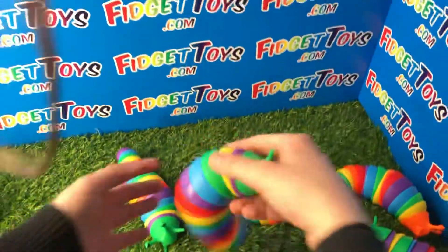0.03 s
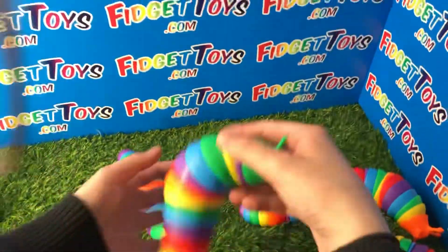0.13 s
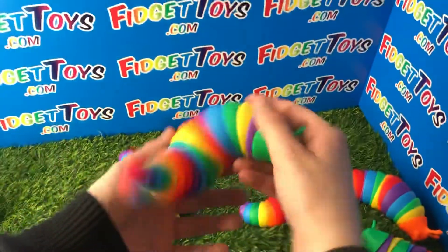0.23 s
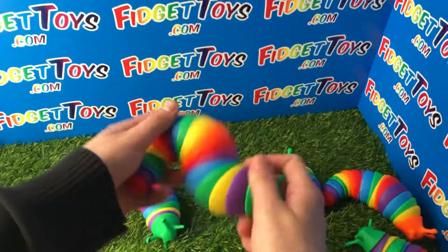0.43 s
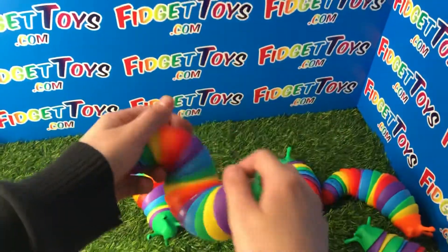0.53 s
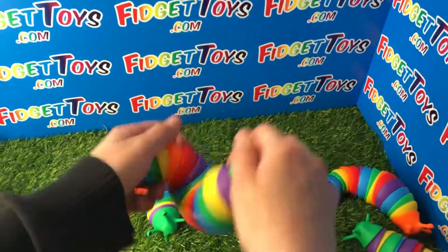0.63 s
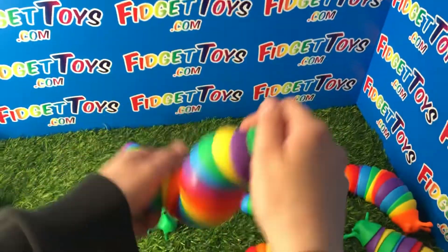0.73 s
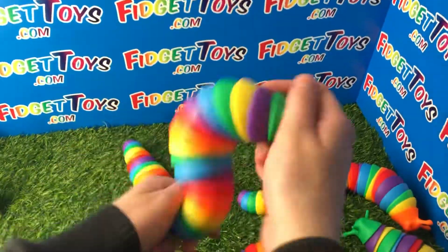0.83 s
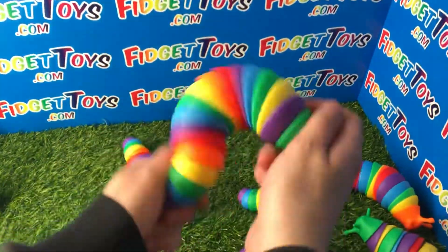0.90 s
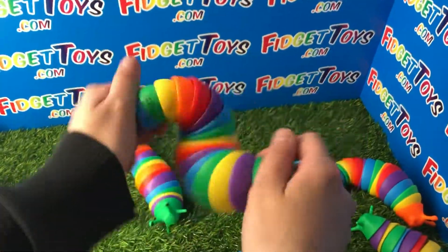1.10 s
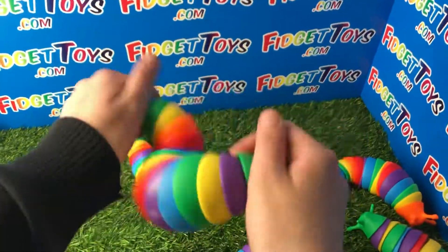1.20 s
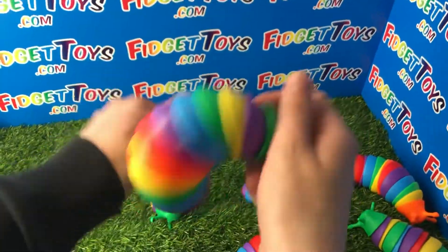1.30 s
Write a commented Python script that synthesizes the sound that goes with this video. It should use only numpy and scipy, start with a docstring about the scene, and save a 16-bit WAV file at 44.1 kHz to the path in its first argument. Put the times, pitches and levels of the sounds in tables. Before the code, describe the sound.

Plastic segments of a fidget slug click and clatter unevenly, close by in a quiet room.

```python
"""Two hands flex a segmented plastic slug toy close by in a small, quiet room.
From the start a low hum swells and fades over steady noise, and friction makes the joints rub and tick.
Then the nested cup-shaped segments collide in bursts: each impact excites a sharp crack, a clatter of
the shells and the damped modes of a cup. Four times the toy's weight bumps softly into the hands.
Near the end, as the knocks weaken, the joints give two faint squeaks."""
import sys
import numpy as np
from scipy import signal
from scipy.fft import rfft, irfft, next_fast_len
from scipy.io import wavfile
from scipy.ndimage import map_coordinates

SR = 44100
rng = np.random.default_rng(int(sys.argv[2]) if len(sys.argv) > 2 else 0)


def generate_wav(sig):
    """Save sig (samples, or channels by samples) to the path in sys.argv[1] as 16-bit PCM at SR."""
    pcm = np.round(np.clip(np.atleast_2d(sig).T, -1, 1) * 32767).astype(np.int16)
    wavfile.write(sys.argv[1], SR, pcm)


N = 59535
CONTACT_S, KNOCK_S = 0.00197, 0.004
TOP_HZ = 16000


def amp(db):
    """Amplitude ratio of a level in decibels."""
    return 10 ** (np.asarray(db) / 20)


def unit(x):
    """Normalisation to rms 1."""
    return x / np.sqrt(np.mean(x ** 2) + 1e-20)


def along(points, hz):
    """Interpolation of (f/Hz, value) rows on a logarithmic frequency axis."""
    f, values = np.transpose(points)
    return np.interp(np.log(hz + 1), np.log(f + 1), values)


def envelope(rows):
    """Amplitude at each sample, interpolated from (t/s, level/dB) rows."""
    return amp(np.interp(np.arange(N) / SR, *np.transpose(rows)))


def wobble(rate):
    """Random modulation: a spline through `rate` random values a second."""
    return map_coordinates(rng.standard_normal(N // 10), [np.arange(N) * rate / SR], mode="wrap")


def noise(spectrum, size, ripple_db=0, ripple_hz=500):
    """Filtered white noise of rms 1; ripple adds the spectral peaks and dips of one contact point."""
    hz = np.fft.rfftfreq(size, 1 / SR)
    ripple = map_coordinates(rng.standard_normal(int(SR / ripple_hz)), [hz / ripple_hz])
    gain = amp(along(spectrum, hz) + ripple_db * ripple)
    return unit(irfft(rfft(rng.standard_normal(size)) * gain, size))


def strike(t, attack_s, t60_s):
    """Impact envelope: a rise, undamped during contact, then exponential free decay."""
    decay = np.exp(-np.log(1000) * np.maximum(t - CONTACT_S, 0) / t60_s)
    return (1 - np.exp(-t / attack_s)) * decay


def at_level(x, db):
    """Equal energy: x is scaled to match a level db held for KNOCK_S."""
    return amp(db) * x * np.sqrt(KNOCK_S * SR / (np.sum(x ** 2) + 1e-20))


def add(track, start_s, x):
    """Superposition of x on the track."""
    i = max(round(start_s * SR), 0)
    track[i:i + len(x)] += x[:max(len(track) - i, 0)]


# Envelope of the hum: t/s, level/dB
HUM_LEVELS = [(0, -53), (.07, -49), (.21, -48), (.56, -69.5), (.92, -59.5), (1.3, -68)]
# Spectrum of the ambient noise: f/Hz, relative level/dB
AMBIENT_SPECTRUM = [(25, -28), (55, 14), (110, -0.5), (220, -4), (2000, -8), (4000, -19), (15500, -36)]


def background(hum_hz=83.2, octave_db=-18.5, ambient_db=-59.5):
    """Amplitude modulation: a fundamental and its octave swell and fade over steady room noise."""
    phase = 2 * np.pi * hum_hz * np.arange(N) / SR
    hum = unit(np.sin(phase) + amp(octave_db) * np.sin(2 * phase))
    return envelope(HUM_LEVELS) * hum + amp(ambient_db) * noise(AMBIENT_SPECTRUM, N)


# Spectrum of the plastic shells: f/Hz, relative level/dB
SHELL_SPECTRUM = [(200, -33), (700, -26), (1050, -15), (1450, -2), (2150, 4.5), (2650, 2.5), (3700, -24),
                  (8000, -39)]


def clatter(t):
    """Impact excitation: the shells answer a touch with a decaying band of noise."""
    return noise(SHELL_SPECTRUM, len(t)) * strike(t, attack_s=0.0009, t60_s=0.021)


# Envelope of the segments' sliding: t/s, level/dB
RUB_LEVELS = [(0, -57.5), (.14, -61), (.28, -50.5), (.49, -49), (.6, -61), (.8, -44), (.86, -59),
              (1.35, -61)]
# Spectrum of the friction noise: f/Hz, relative level/dB
RUB_SPECTRUM = [(400, -26), (1000, -12), (1600, -5), (2500, 1), (3900, -14), (5200, -9.5), (7000, -14),
                (15000, -18.5)]


def rubbing(roughness_db=1.8, ticks_per_s=42, tick_db=5, count=120):
    """Sliding friction: the joints scrape in small uneven slips, and light touches tick above them."""
    slide = unit(noise(RUB_SPECTRUM, N) * amp(roughness_db * wobble(rate=300)))
    t = np.arange(1024) / SR
    for start_s in (np.arange(count) + rng.random(count)) / ticks_per_s:
        add(slide, start_s, at_level(clatter(t), tick_db + rng.normal(0, 0.99)))
    return envelope(RUB_LEVELS) * slide


def mode(t, hz, db):
    """A normal mode, excited with random strength and phase."""
    return amp(db + rng.normal(0, 2.14)) * np.sin(2 * np.pi * (hz * t + rng.random()))


# Modes of a cup: f/(ring pitch), relative level/dB
CUP_PARTIALS = [(0.76, -19), (0.996, 0.5), (1.089, -4.5)]


def cup_ring(t, pitch_hz):
    """Damped free vibration: the modes of a struck cup give a hollow ring."""
    modes = sum(mode(t, pitch_hz * ratio, db) for ratio, db in CUP_PARTIALS)
    return modes * strike(t, attack_s=0.0006, t60_s=0.017)


# Modes of a segment's rim: f/Hz, relative level/dB
RIM_PARTIALS = [(5100, 5.5), (6400, -20), (7900, 5), (11500, -6)]
# Spectrum of the crack: f/Hz, relative level/dB
CRACK_SPECTRUM = [(500, -20.5), (2500, -26), (3800, 1.5), (5100, 4), (6800, -1), (11500, -5), (15500, -8.5)]


def crack(t, hardness_db, attack_s=0.00016, ping_db=-7):
    """Contact transient: a broadband burst, brighter for a harder impact, and a ping of the rim modes."""
    rim = sum(mode(t, hz * rng.normal(1, 0.0188), db) for hz, db in RIM_PARTIALS)
    ping = amp(ping_db) * unit(rim) * strike(t, attack_s, t60_s=0.028)
    spectrum = [(hz, db + 0.22 * hardness_db * hz / TOP_HZ) for hz, db in CRACK_SPECTRUM]
    snap = 1 + 1.15 * np.exp(-2 * t / CONTACT_S)  # strongest at first touch
    burst = noise(spectrum, len(t), ripple_db=5) * snap * strike(t, attack_s, t60_s=0.022)
    return burst + ping


# Reverberation time of the room: f/Hz, T60/s
ROOM_T60 = [(2500, 0.21), (14000, 0.14)]


def room(x, tail_db=-18.5, walls_db=-21, max_delay_s=0.012, count=8):
    """Reverberation: weak early reflections from near walls and a short diffuse tail join the sound."""
    hz, t, spectra = signal.stft(rng.standard_normal(12288), SR)
    decay = np.exp(-np.log(1000) * t / along(ROOM_T60, hz)[:, None])
    tail = signal.istft(spectra * decay, SR)[1]
    response = amp(tail_db) * tail / np.linalg.norm(tail)
    delays = (SR * max_delay_s * rng.uniform(0.2, 1, count)).astype(int)
    response[delays] += amp(walls_db) * rng.choice([-1, 1], count) / np.sqrt(count)
    response[0] += 1  # direct sound
    return signal.fftconvolve(x, response)


# Impacts between segments: t/s, ring level/dB, ring pitch f/Hz, clatter level/dB, crack level/dB
IMPACTS = [(.075,-43,1830,-47.5,-53), (0.1544,-41,2440,-41,-41.5), (.173,-33,1490,-44,-48),
           (.2092,-22.5,1524,-38,-39), (0.2093,-22,2234,-27.5,-33.5), (.23,-16.5,2702,-31,-25.5),
           (0.2368,-20.5,2940,-34.5,-36), (0.2434,-27.5,2540,-25.5,-31), (0.2493,-22.5,3376,-26.5,-24.5),
           (.257,-33,2620,-30.5,-38.5), (.27,-34,2800,-41,-45.5), (.322,-40,2360,-36,-42),
           (0.363,-41,2100,-38.5,-46.5), (.382,-28,2234,-30.5,-39.5), (.405,-28,2150,-32,-44.5),
           (0.4255,-31,3500,-33,-58), (0.4262,-22,2694,-31,-38.5), (0.435,-30,2210,-29.5,-47),
           (.455,-33,2310,-26.5,-28), (.47,-51,2170,-39,-36), (.484,-38.5,2580,-34.5,-37),
           (0.546,-30.5,2457,-32.5,-43), (.63,-33,1910,-34,-52), (.639,-32,2040,-38,-43.5),
           (0.651,-32,2030,-35,-53), (0.6621,-30,2215,-30.5,-40.5), (.696,-37,2320,-34.5,-39.5),
           (0.7012,-32,2305,-31,-45), (.722,-33,2060,-27.5,-28.5), (0.727,-29.5,2516,-35,-49),
           (0.745,-33.5,2960,-39,-40), (0.753,-24,2560,-28.5,-26), (0.764,-33,2310,-23.5,-26),
           (0.777,-30,3230,-37,-46), (0.78,-19.5,1946,-29,-34.5), (.801,-36,2390,-36,-43.5),
           (0.8294,-32.5,2120,-28.5,-43.5), (.872,-47,1900,-32,-43), (.901,-55,2210,-41,-49),
           (0.9386,-16.5,2837,-24,-29), (1.0332,-23,2214,-58,-38.5), (1.0341,-23.5,1785,-33.5,-42),
           (1.06,-41,1770,-39,-50), (1.151,-46,1980,-41,-53.5), (1.194,-55,2150,-41,-70),
           (1.202,-50,1800,-40.5,-54.5), (1.2305,-44,1470,-48,-52.5), (1.241,-46,2130,-50.5,-63),
           (1.28,-41.5,1520,-33,-46.5)]


def knocks():
    """Collision: each impact excites a ring, a clatter and a crack together, and the room responds."""
    out, t = np.zeros(N), np.arange(4096) / SR
    mean_crack_db = np.mean([row[-1] for row in IMPACTS])
    for start_s, ring_db, pitch_hz, clatter_db, crack_db in IMPACTS:
        knock = at_level(cup_ring(t, pitch_hz), ring_db)
        knock += at_level(clatter(t), clatter_db)
        knock += at_level(crack(t, crack_db - mean_crack_db), crack_db)
        add(out, start_s, room(knock))
    return out


# Soft impacts on the hands: t/s, level/dB
HAND_BUMPS = [(.363, -54), (0.722, -57), (.938, -55), (1.064, -60)]


def thuds(hz=356):
    """Damped oscillation: the toy's weight lands in the hands with one brief, low tone."""
    out, t = np.zeros(N), np.arange(2048) / SR
    bump = np.sin(2 * np.pi * hz * t) * strike(t, attack_s=0.0009, t60_s=0.021)
    for start_s, db in HAND_BUMPS:
        add(out, start_s, at_level(bump, db))
    return out


# Squeaks of the joints: t/s, duration/s, f/Hz, level/dB
JOINT_SQUEAKS = [(1.09, 0.1, 3085, -58), (1.236, 0.057, 589, -59)]


def squeaks(waver=0.0415):
    """Friction-excited vibration: a sliding joint sings faintly on one wavering pitch."""
    out = np.zeros(N)
    for start_s, duration_s, hz, db in JOINT_SQUEAKS:
        swell = signal.windows.tukey(int(duration_s * SR), 0.5)
        pitch_hz = hz * (1 + waver * wobble(rate=360))
        phase = 2 * np.pi * np.cumsum(pitch_hz) / SR
        add(out, start_s, amp(db) * swell * unit(np.sin(phase[:len(swell)])))
    return out


def scene():
    """Superposition: the sounds of the toy and the background add in one channel."""
    return (knocks() + thuds() + rubbing() + squeaks() + background())[None]


def record(dry):
    """Band limiting: a zero-phase low-pass filter cuts steeply above TOP_HZ."""
    size = next_fast_len(N + SR // 2)
    hz = np.fft.rfftfreq(size, 1 / SR)
    return irfft(rfft(dry, size) / (1 + (hz / TOP_HZ) ** 96), size)[..., :N]


dry = scene()
out = record(dry)
generate_wav(out)
```